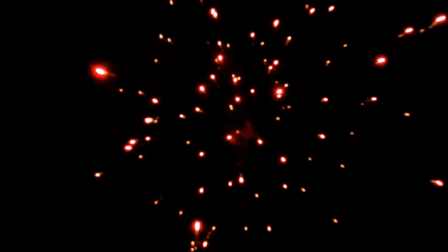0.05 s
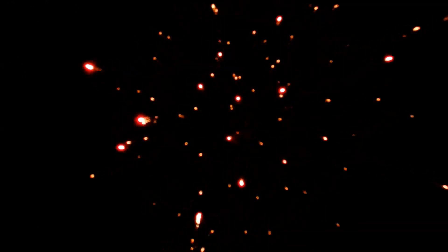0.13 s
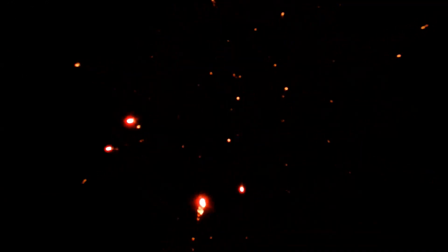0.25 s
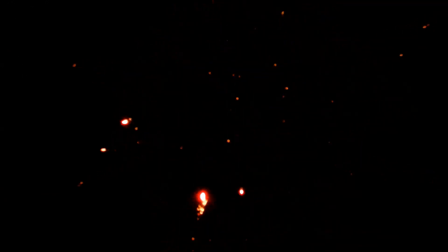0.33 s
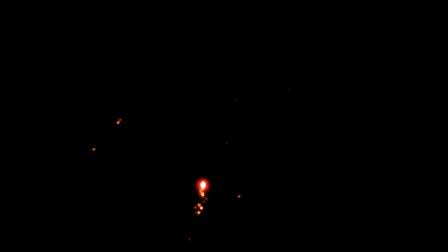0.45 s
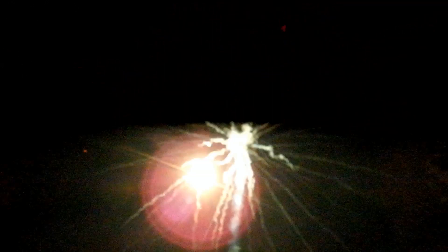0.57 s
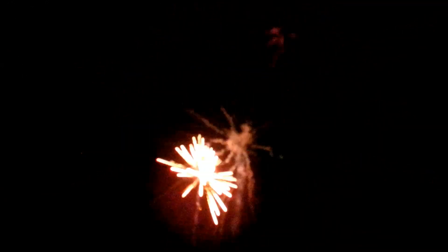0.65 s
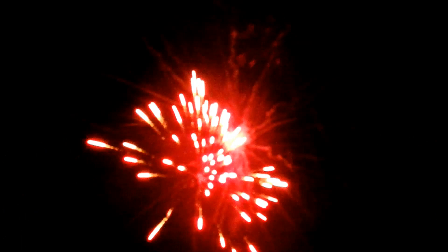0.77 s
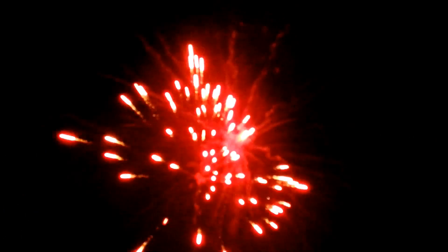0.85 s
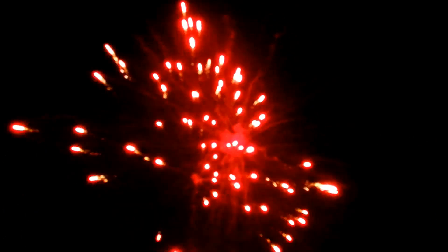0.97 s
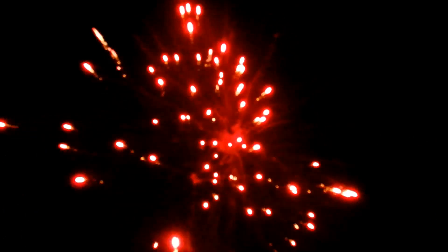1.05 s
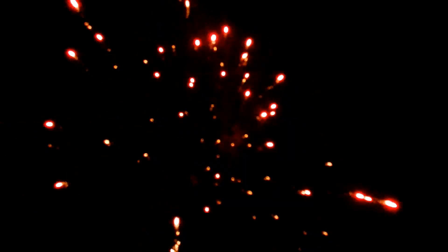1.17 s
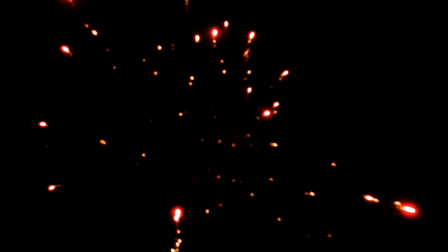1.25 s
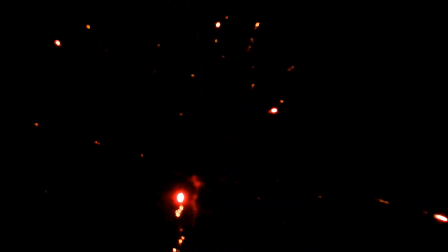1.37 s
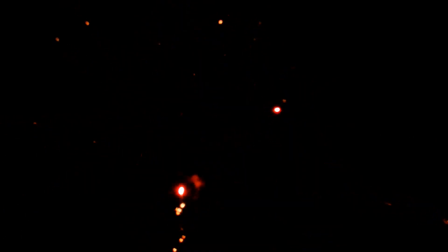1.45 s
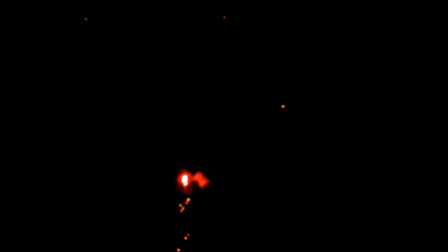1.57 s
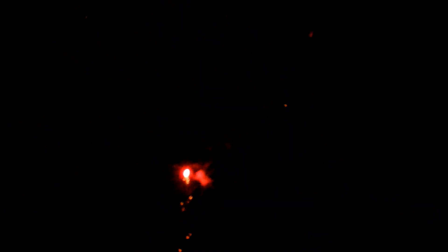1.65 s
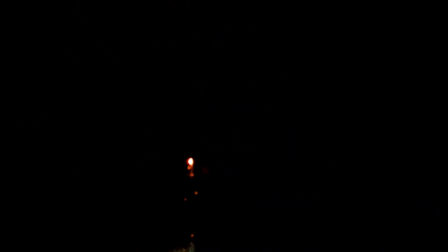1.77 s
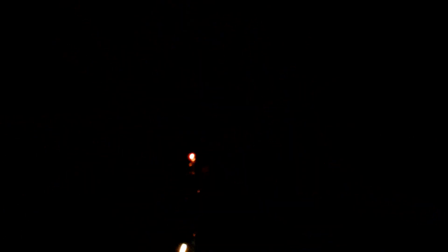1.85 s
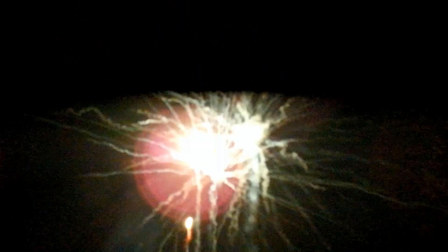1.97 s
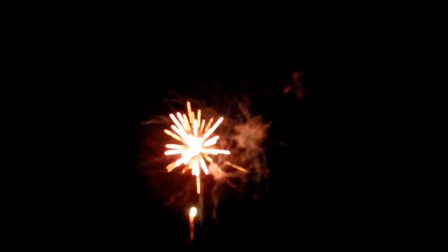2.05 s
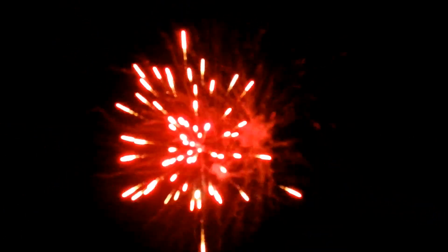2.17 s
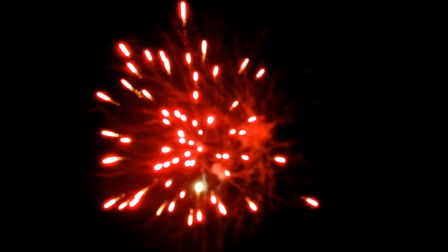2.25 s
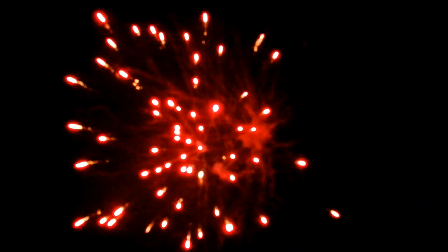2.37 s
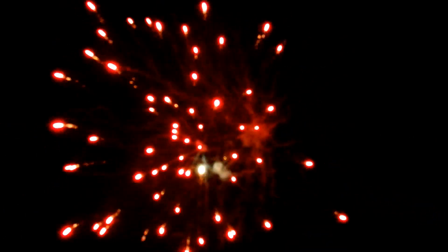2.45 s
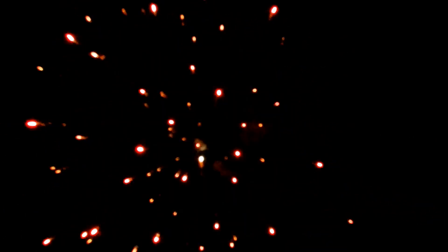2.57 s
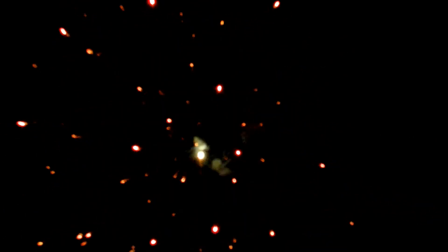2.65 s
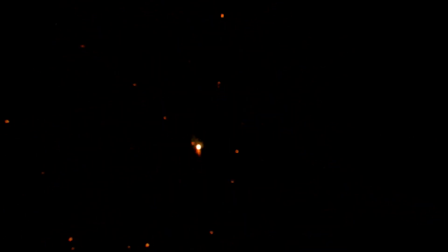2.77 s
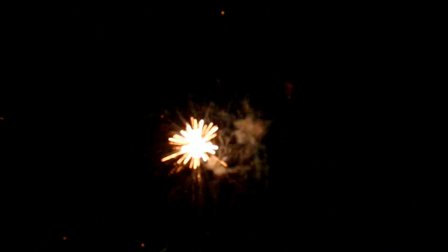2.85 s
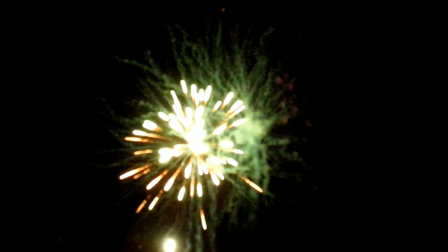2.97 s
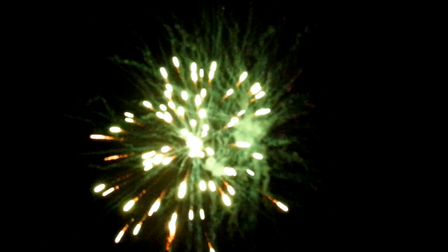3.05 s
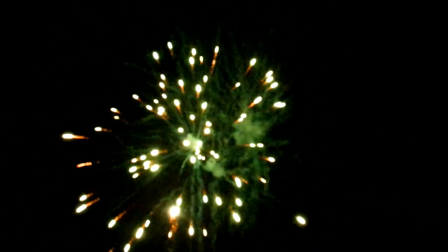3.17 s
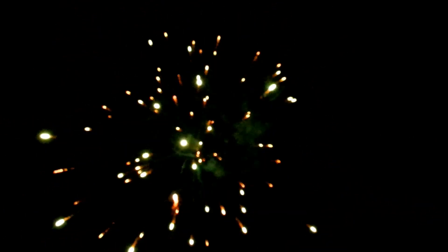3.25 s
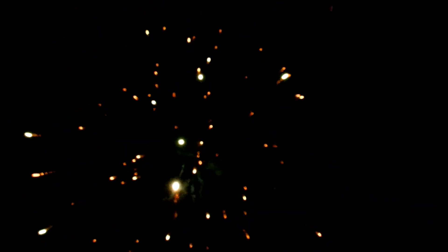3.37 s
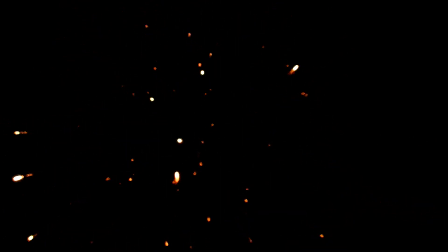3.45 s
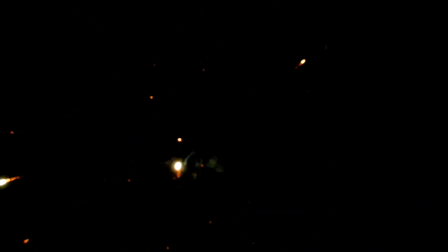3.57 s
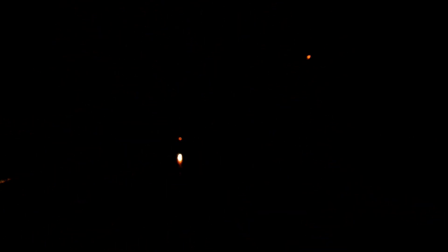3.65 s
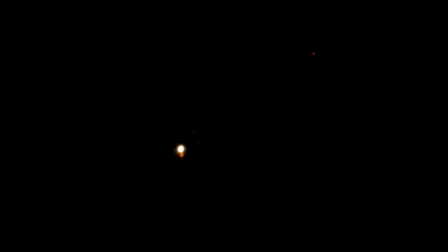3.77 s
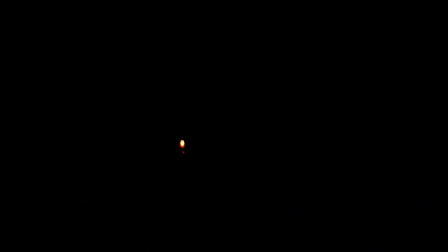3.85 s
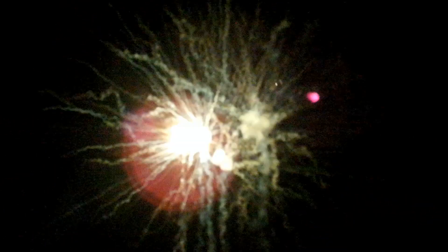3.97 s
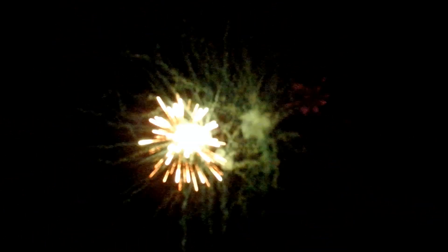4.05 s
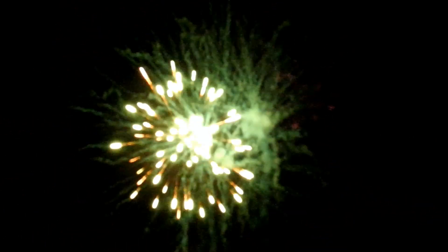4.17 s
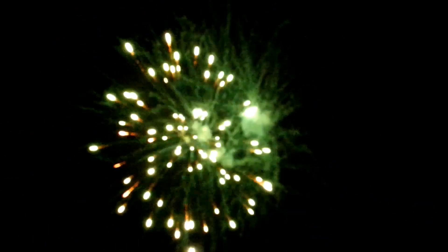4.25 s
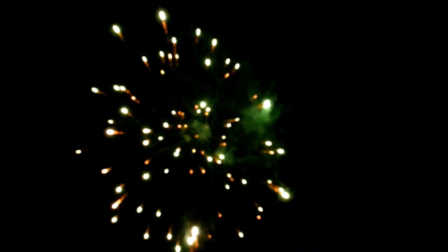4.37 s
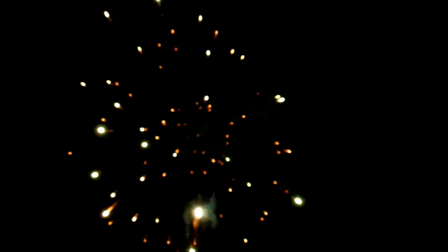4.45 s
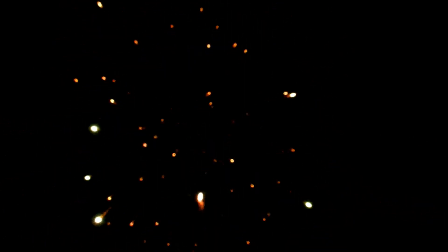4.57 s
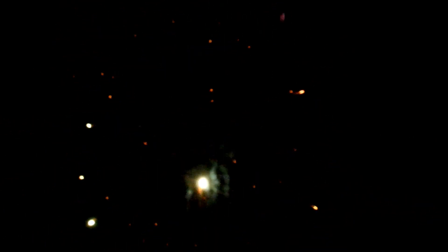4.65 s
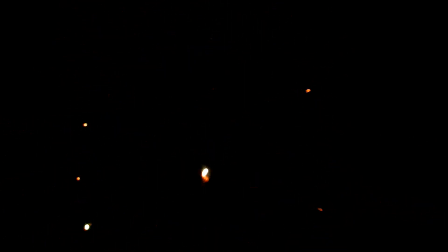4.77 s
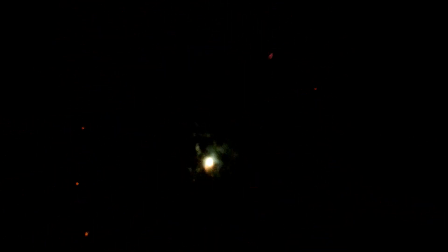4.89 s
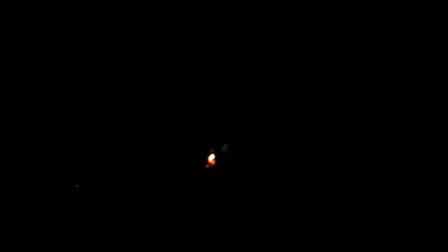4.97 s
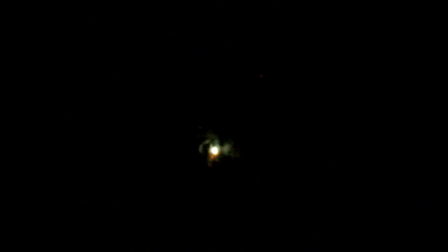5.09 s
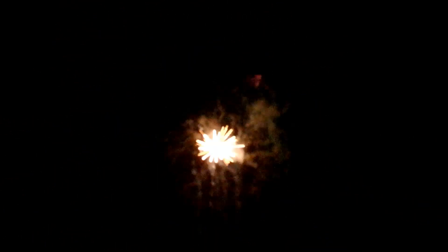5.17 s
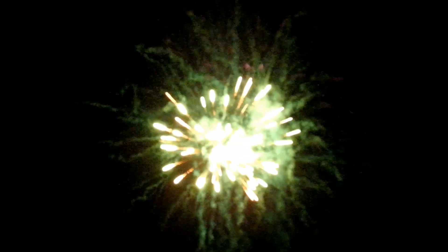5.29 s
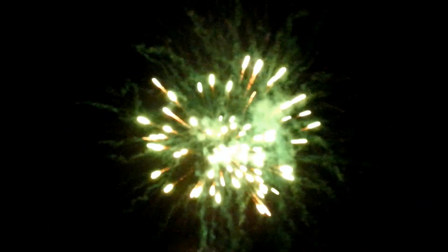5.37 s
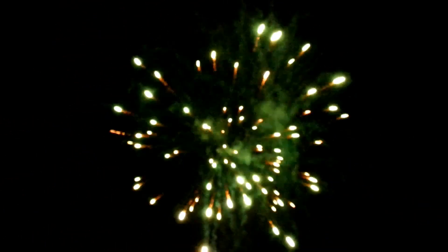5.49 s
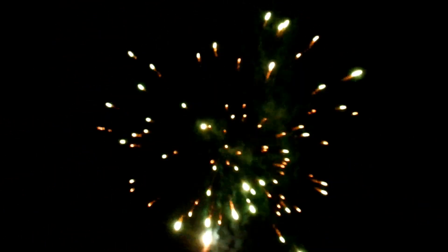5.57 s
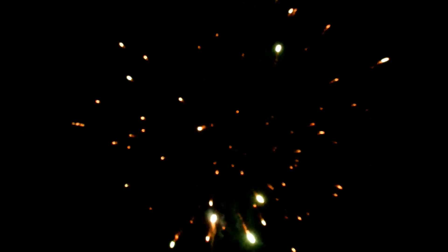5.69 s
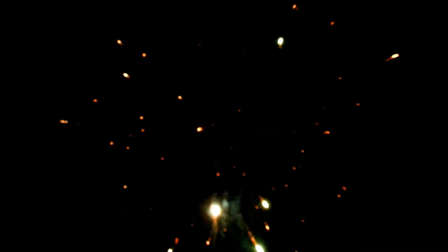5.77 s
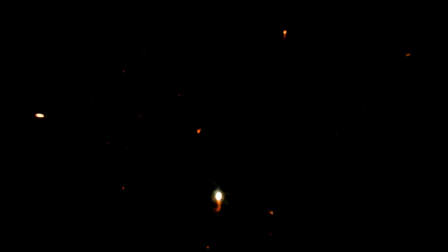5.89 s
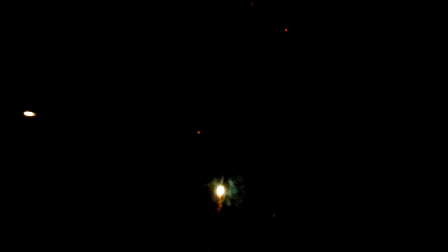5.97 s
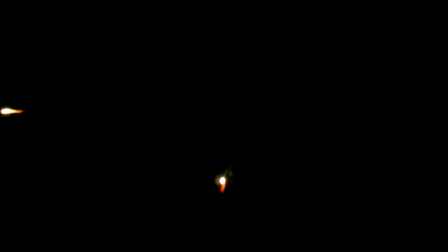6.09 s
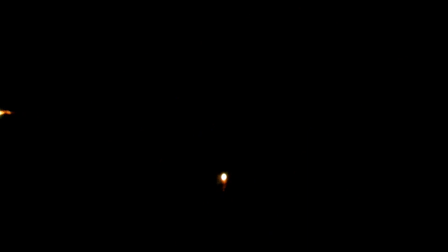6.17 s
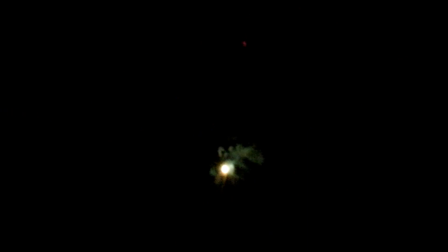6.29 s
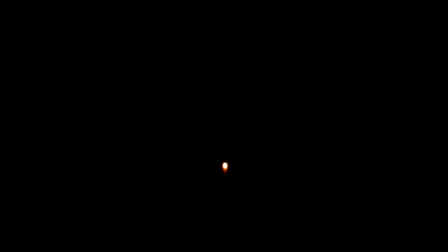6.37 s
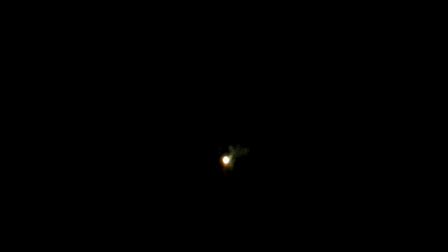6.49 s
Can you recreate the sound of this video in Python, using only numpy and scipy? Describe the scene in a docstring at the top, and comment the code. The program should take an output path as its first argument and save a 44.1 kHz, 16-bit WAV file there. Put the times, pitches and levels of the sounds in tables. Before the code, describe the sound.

A firework cake fires at night, sharp launch cracks alternating with loud bursts, rolling echoes and faint crackle.

```python
"""Firework cake at night

A multi-shot cake fires near a small stereo microphone. Each lift charge cracks at the muzzle and
excites the air column of its tube. Shells burst overhead, and each shock wave is followed by its
reflection from a nearby wall. Echoes of the shots roll back from the neighbourhood, dulled by
absorption in the air, while burning stars hiss and spit."""
import sys
import numpy as np
from scipy import signal
from scipy.io import wavfile
from scipy.ndimage import uniform_filter1d

SR = 44100
rng = np.random.default_rng(int(sys.argv[2]) if len(sys.argv) > 2 else 0)


def transcribe(signal):
    """Save signal, clipped to [-1, 1], as a 16-bit WAV file at the path in sys.argv[1]."""
    frames = np.atleast_2d(signal).T
    limited = np.clip(frames, -1, 1)
    pcm = np.round(limited * 32767).astype(np.int16)
    wavfile.write(sys.argv[1], SR, pcm)


N = 287973

# Lift charges: (time [s], crack [dB], air column [dB], knock [Hz], knock [dB], rim [Hz], rim [dB],
# grit [dB], tick [dB], bright echoes [dB], gas leak [dB])
LIFTS = [(0.2977, -2, 1, 1890, -13.5, 4150, -8.5, -18, -30, -46, -22),
         (1.1837, -3.5, -1.5, 2030, -6.5, 3080, -16.5, -20.5, -30, -47, -36),
         (2.256, -7, -3, 1980, -18.5, 3280, -15.5, -22.5, -30, -50.5, -41),
         (3.5496, -8, -2, 1770, -10, 5190, -13, -21.5, -35, -48.5, -31),
         (4.7116, -3, -0.5, 1820, -10, 5180, -13, -17.5, -28, -48, -28),
         (6.3990, -7.5, 3, 1830, -9, 3200, -8, -16, -31, -45.5, -9.5)]
# Shell bursts: (time [s], shock [dB], rebound delay [ms], wall delay [ms], scattered tail [dB],
# far echoes [dB], star hiss [dB])
BURSTS = [(0.7097, 2.5, 0.37, 10.8, -21.5, -22, -41.5), (2.1219, 3, 0.38, 11, -23, -23, -43),
          (2.9468, 2.5, 0.57, 11, -24.5, -24, -42.5), (4.0894, 2, 0.43, 10.7, -24, -24, -42),
          (5.2453, 3, 0.38, 10.4, -21, -21.5, -42.5)]
# A burst still echoing at the start: (time [s], far echoes [dB], star hiss [dB])
EARLIER_BURST = (-0.35, -23, -45)
# Likeness of the diffuse sound in the two channels: (frequency [Hz], coherence [0-1])
COHERENCE = [(60, 0.77), (130, 0.99), (290, 0.99), (640, 0.99), (1410, 0.96), (3100, 0.87), (6820, 0.74),
             (15000, 0.074)]
# Balance of the diffuse sound: (frequency [Hz], left minus right [dB])
BALANCE = [(60, -4), (180, 2.0), (550, 2), (1650, 1), (4970, 0.0), (15000, -3)]
# Spectrum of the rumble: (frequency [Hz], level [dB])
RUMBLE_SPECTRUM = [(24, -91), (40, -76), (139, -30), (307, -5), (344, -6.5), (395, -5.5), (542, -6),
                   (580, -4.5), (621, -5.5), (796, -11), (912, -14), (1200, -11.5), (9000, -55),
                   (11700, -105), (19800, -120)]
# Envelope of a burst's far echoes: (delay [s], level [dB], tilt [dB/octave])
FAR_ECHOES = [(0, -30, -2), (.06, -10.5, 1), (.11, 1.5, -1.5), (.24, -3.5, -1), (.4, -7, 1.26),
              (.7, -12, 0.76), (1.4, -13, -5.5)]
# Spectrum of the hiss: (frequency [Hz], level [dB])
HISS_SPECTRUM = [(880, -31.5), (1500, -2.5), (1680, -11), (2810, -12), (3090, -16), (6490, -24),
                 (13200, -37), (15000, -52)]
# Fuses and rising stars flaring: (time [s], rise [s], length [s], level [dB], change over length [dB])
FLARES = [(.02, .02, .2, -64, -7), (.64, .04, 0.018, -54, -3), (1.82, .02, 0.07, -63.5, 3),
          (2.08, .03, .012, -64, -3), (3.885, .085, 0.12, -55, -3), (4.39, .018, 0.18, -52.5, -18),
          (5.045, 0.048, 0.14, -52.5, -2), (5.812, .022, .13, -52.5, -15), (5.97, .03, .11, -64, -7),
          (6.127, .011, .005, -61, -3), (6.155, .035, .055, -58.5, -7), (6.243, .06, .024, -56, -3)]
# Envelope of a lift's bright echoes: (delay [s], level [dB])
LIFT_ECHOES = [(.004, -1), (.014, -8), (.028, -11), (.046, -1), (.08, -3.5), (.112, 1), (.16, -5.5),
               (.33, -15.5), (.6, -45)]
# Prominent sparks: (time [s], level [dB])
SPARKS = [(0.2319, -39), (0.2824, -40), (0.3426, -38), (0.6474, -45), (1.6965, -50), (1.8367, -45),
          (1.8598, -41), (2.0492, -45), (2.9297, -43), (3.9744, -38), (4.7716, -35), (6.109, -42),
          (6.3779, -46), (6.4575, -37.5)]
# Spectrum of a burst's scattered tail: (frequency [Hz], level [dB])
TAIL_SPECTRUM = [(59, -43), (100, 10), (322, -6), (854, 0.5), (991, -14), (1310, -5), (5300, -14.5),
                 (10900, -22.5), (14100, -36), (16000, -91)]
# Reverberation time of that tail: (frequency [Hz], T60 [s])
TAIL_T60 = [(300, 0.21), (1000, 1.12), (2700, 1.43), (5000, 1), (11000, 0.62)]
# Distinct echoes from far walls: (time [s], level [dB], frequency [Hz])
WALL_THUMPS = [(0.829, -38, 670), (0.885, -21.5, 614), (1.04, -25.5, 590), (1.295, -30, 410),
               (1.413, -27.5, 570), (1.956, -23.5, 413), (2.289, -22, 625), (2.421, -25, 368),
               (3.112, -21.5, 556), (3.162, -23.5, 283), (3.466, -28.5, 724), (3.866, -29.5, 533),
               (4.174, -25.5, 540), (4.26, -23.5, 367), (4.439, -23, 540), (5.319, -26, 597),
               (5.407, -25, 532), (5.993, -24.5, 527), (6.442, -43, 670), (6.491, -26.5, 420)]

RUMBLE_DB, TREBLE_DB_PER_OCT, BASS_DB_PER_OCT, BASS_HZ = -31, -4.5, -3.5, 400
DIP_DB, DIP_DELAY_S, DIP_WIDTH_S = -1, 0.083, 0.07  # the rumble dips briefly after each shot
STAR_RISE_S, STAR_FADE_DB_PER_S, FIZZ_DB = 0.055, -42, -71.5
FLARE_EDGE_DB, FLARE_STOP_S, FLARE_DB_PER_OCT, ECHO_DB_PER_OCT = -7.5, .01, 4, -1
FAINT_SPARKS, FAINT_DB, FAINT_SPREAD_DB, TICK_DELAY_S = 90, -64, 3, .0195
TUBE_HZ, TUBE_T60_S, KNOCK_T60_S, RIM_T60_S = 266, 0.011, 0.007, 0.004
PING_HZ, PING_DB = 7960, -10.5  # a high tube mode; level relative to the rim


def amp(db):
    """Amplitude ratio of a level in decibels."""
    return 10 ** (np.asarray(db) / 20)


def at_hz(points, hz):
    """Interpolation along a logarithmic frequency axis."""
    f, value = np.transpose(points)
    return np.interp(np.log(hz + 1), np.log(f + 1), value)


def unit_power(spectrum, hz):
    """Spectral gain normalised to unit mean power."""
    gain = amp(at_hz(spectrum, hz))
    return gain / np.sqrt(np.mean(gain ** 2))


def envelope(profile, age):
    """Level and further columns of a profile, age seconds after its event; silent outside it."""
    times, level_db, *rest = np.transpose(profile)
    level = np.interp(age, times, level_db, left=-200, right=-200)
    return level, *[np.interp(age, times, column) for column in rest]


def add(mix, start_s, sound):
    """Superposition of a sound on the mix."""
    part = mix[..., round(start_s * SR):][..., :sound.shape[-1]]
    part += sound[..., :part.shape[-1]]


def band(x, lo_hz, hi_hz):
    """Butterworth band-pass filter."""
    return signal.lfilter(*signal.butter(2, [lo_hz, hi_hz], "band", fs=SR), x)


def diffuse_noise(gain, patchy_db, flicker_db, size=512):
    """A diffuse field: partly coherent stereo noise, its short-time spectra shaped by gain(hz, s)."""
    hop = size // 4
    frames, hz = N // hop + 5, np.fft.rfftfreq(size, 1 / SR)[:, None]
    a, b, c, d, patch = rng.standard_normal((frames, len(hz), 5)).T
    patch = uniform_filter1d(uniform_filter1d(patch, size=5, axis=0), size=9, axis=1)
    flicker = uniform_filter1d(rng.standard_normal(frames), size=3)  # shared by all bands
    coherence = np.clip(at_hz(COHERENCE, hz), 0, 1)
    left = a + 1j * b
    right = coherence * left + np.sqrt(1 - coherence ** 2) * (c + 1j * d)
    pan = amp(at_hz(BALANCE, hz) / 2)
    spectra = np.array([left * pan, right / pan])
    spectra *= amp(patchy_db * patch / patch.std() + flicker_db * flicker / flicker.std())
    spectra *= gain(hz, np.arange(frames) * hop / SR)
    return signal.istft(spectra, nperseg=size, noverlap=size - hop)[1][:, :N] / np.sqrt(size)


def far_rumble():
    """Incoherent summation: echoes from far houses add in power and merge into a dull roll."""
    def gain(hz, s):
        octaves_up = np.log2(np.maximum(hz, 600) / 600)
        octaves_down = np.log2(BASS_HZ / np.clip(hz, 60, BASS_HZ))
        power = amp(RUMBLE_DB + octaves_up * TREBLE_DB_PER_OCT + octaves_down * BASS_DB_PER_OCT) ** 2
        for start, *_, far_db, _ in BURSTS + [EARLIER_BURST]:
            shape_db, tilt = envelope(FAR_ECHOES, s - start)
            power = power + amp(far_db + shape_db + octaves_up * tilt) ** 2
        dips = sum(np.exp(-((s - start - DIP_DELAY_S) / DIP_WIDTH_S) ** 2)
                   for start, *_ in LIFTS + BURSTS)
        return unit_power(RUMBLE_SPECTRUM, hz) * np.sqrt(power) * amp(DIP_DB * dips)
    return diffuse_noise(gain, patchy_db=1.2, flicker_db=1.0)


def burning_hiss():
    """Combustion noise of stars and fuses adds in power to a faint fizz and the lifts' bright echoes."""
    def gain(hz, s):
        colour = unit_power(HISS_SPECTRUM, hz)
        treble_rms = np.sqrt(np.mean(colour ** 2 * (hz > 4000) * (hz < 10000)))
        octaves = np.log2(np.maximum(hz, 1500) / 6000)
        parts = [amp(FIZZ_DB)]
        for start, *_, star_db in BURSTS + [EARLIER_BURST]:
            ignition = np.clip((s - start) / STAR_RISE_S, 0, 1)
            parts.append(ignition * amp(star_db + STAR_FADE_DB_PER_S * (s - start)))
        for start, *_, echo_db, _ in LIFTS:
            parts.append(amp(echo_db + ECHO_DB_PER_OCT * octaves + envelope(LIFT_ECHOES, s - start)[0]))
        for start, rise, length, flare_db, change_db in FLARES:
            shape = [(0, FLARE_EDGE_DB), (rise, 0), (rise + length, change_db),
                     (rise + length + FLARE_STOP_S, change_db + FLARE_EDGE_DB)]
            parts.append(amp(flare_db + FLARE_DB_PER_OCT * octaves + envelope(shape, s - start)[0]))
        return colour / treble_rms * np.sqrt(sum(part ** 2 for part in parts))
    return diffuse_noise(gain, patchy_db=1.6, flicker_db=1.2, size=256)


def sparks():
    """Brief transients are broadband: sparks snap from random sides, and one tick follows each lift."""
    out, t = np.zeros((2, N)), np.arange(260) / SR
    ticks = [(start + TICK_DELAY_S, tick_db) for start, *_, tick_db, _, _ in LIFTS]
    when, size = rng.random((FAINT_SPARKS, 2)).T
    faint = list(zip(when * N / SR, FAINT_DB - FAINT_SPREAD_DB * np.log(1 - size)))
    for start, level_db in ticks + SPARKS + faint:
        pan_db = 2.5 * rng.standard_normal()
        grit = band(rng.standard_normal(len(t)), 3500, 9500)
        snap = grit * amp(level_db - 60 * t / 0.0082) * np.minimum(t / 0.0011, 1)
        add(out, start, snap * amp([[pan_db], [-pan_db]]))
    return out


def blast(t, positive_ms, cutoff_hz):
    """Friedlander wave: a pressure jump falls through zero into suction; the air rounds its front."""
    u = np.maximum(t, 0) * 1000 / positive_ms
    wave = (t >= 0) * (1 - u) * np.exp(-u)
    pole = np.exp(-2 * np.pi * cutoff_hz / SR)
    return signal.lfilter([(1 - pole) ** 2], [1, -2 * pole, pole ** 2], wave)


def mode(t, hz, db, t60):
    """Free vibration of a damped resonator."""
    return amp(db - 60 * t / t60) * np.sin(2 * np.pi * hz * t)


def lift_charges():
    """Impulse excitation: with a crack and a spurt of gas, a charge rings its tube's air and wall."""
    out, t = np.zeros((2, N)), np.arange(1500) / SR
    jets = band(rng.standard_normal((len(LIFTS), 3, len(t))), 1330, 8800)
    crack = .5 * blast(t - .00075, 0.15, 2800) - blast(t, 0.37, 4500)  # rebound and jump
    age = np.maximum(t - .0004, 0)  # the air column answers after the crack
    column_hz = TUBE_HZ * (1 + .5 * np.exp(-age / 0.0017))  # pitch sags as the gas cools
    column_gate = (1 - np.exp(-age / 0.00052)) / (1 + (age / 0.0035) ** 6)
    for lift, jet in zip(LIFTS, jets):
        start, crack_db, column_db, knock_hz, knock_db, rim_hz, rim_db, grit_db, *_, leak_db = lift
        column = mode(age, column_hz, column_db, TUBE_T60_S) * column_gate
        knock = mode(t, knock_hz, knock_db, KNOCK_T60_S)  # the shell strikes the tube wall
        rim = mode(t, rim_hz, rim_db, RIM_T60_S) + mode(t, PING_HZ, rim_db + PING_DB, RIM_T60_S)
        grit = amp(grit_db - 60 * t / 0.011) * (jet[0] + 0.65 * jet[1:])
        shot = column * amp([[.7], [-.7]]) - knock - rim + amp(crack_db) * crack + grit
        add(out, start, band(shot, 180, 7700))  # a small muzzle radiates no deep bass
        leak = band(rng.standard_normal(300), 940, 2200) * np.hanning(300)  # gas slips past the shell
        add(out, start - .0055, amp(leak_db) * leak)
    return out


def shell_bursts():
    """Specular reflection: a shock and its rebound arrive directly, then broadened off a near wall."""
    out, t = np.zeros((2, N)), np.arange(1500) / SR
    lag_s = np.array([[0], [.00012]])  # the rebound reaches the right channel later
    # a slow, low push after each bang as the overloaded microphone recovers
    recovery = 0.079 * np.exp(-t / 0.0052) * np.sin(2 * np.pi * 60 * t)
    recovery *= np.hanning(2 * len(t))[len(t):]
    for start, shock_db, rebound_ms, wall_ms, *_ in BURSTS:
        direct = 0.82 * blast(t - rebound_ms / 1000 - lag_s, 0.56, 2800) - 2.1 * blast(t, 0.27, 1960)
        age = t - wall_ms / 1000
        slap = 1.39 * blast(age - .00075, 0.6, 860) - 0.72 * blast(age, 0.85, 4500)
        slap = slap * amp([[.8], [-.8]])  # the wall stands to the left
        add(out, start, amp(shock_db) * (direct + slap + recovery))
    return out


def scattered_tails():
    """Reverberation: countless reflections follow each burst and decay exponentially in each band."""
    def gain(hz, s):
        tails = [amp(tail_db - 60 * (s - start) / at_hz(TAIL_T60, hz)) * (s > start - .02)
                 for start, *_, tail_db, _, _ in BURSTS]
        return unit_power(TAIL_SPECTRUM, hz) * np.sqrt(sum(tail ** 2 for tail in tails))
    t, gate = np.arange(N) / SR, np.ones(N)
    for start, _, _, wall_ms, *_ in BURSTS:
        age = t - start - wall_ms / 1000
        rise = np.clip((age - .002) / 0.0015, 0.094 * (age > -.009), 1)  # faint until the wall echo
        early_boost = 1 + 2.23 * np.exp(-np.maximum(age, 0) / 0.01)  # the nearest are strongest
        gate *= np.where(age > -.045, rise * early_boost, 1)
    return gate * diffuse_noise(gain, patchy_db=0.49, flicker_db=1.7, size=256)


def far_wall_thumps():
    """Discrete echoes: a far wall returns a shot as a few soft, ragged cycles."""
    out, t = np.zeros(N), np.arange(1300) / SR
    swell = t / 0.002 * np.exp(1 - t / 0.0026)
    for start, level_db, hz in WALL_THUMPS:
        ragged = band(rng.standard_normal(len(t)), 380, 950)
        add(out, start, amp(level_db) * swell * (np.sin(2 * np.pi * hz * t) + 1.1 * ragged))
    return out * amp([[.8], [-.8]])


def scene():
    """Linear superposition of the shots, their echoes and the burning stars."""
    shots = shell_bursts() + scattered_tails() + lift_charges()
    return shots + far_rumble() + far_wall_thumps() + burning_hiss() + sparks()


def record(dry):
    """A band-limited transducer: the microphone sheds deep bass, clips and loses the top treble."""
    thin = signal.lfilter(*signal.butter(1, 120, "high", fs=SR), dry)
    dull = signal.lfilter(*signal.butter(2, 11500, fs=SR), np.clip(thin, -1, 1))
    band_limit = signal.firwin(511, 16400, window=("kaiser", 9), fs=SR)
    return signal.oaconvolve(dull, band_limit[None], "same")


dry = scene()
out = record(dry)
transcribe(out)
```